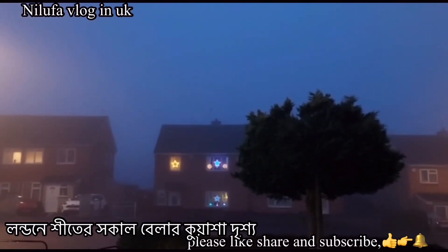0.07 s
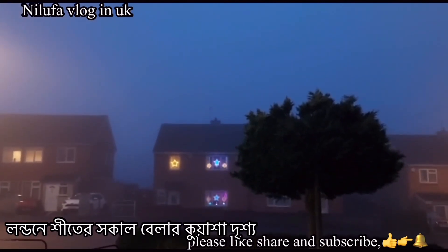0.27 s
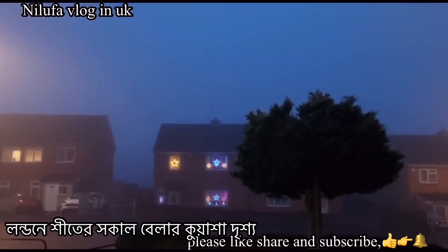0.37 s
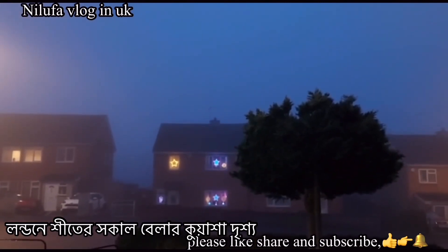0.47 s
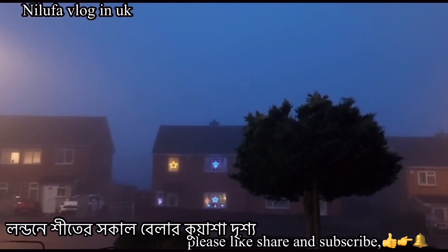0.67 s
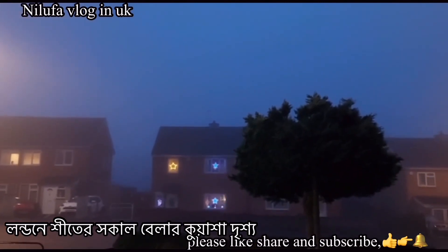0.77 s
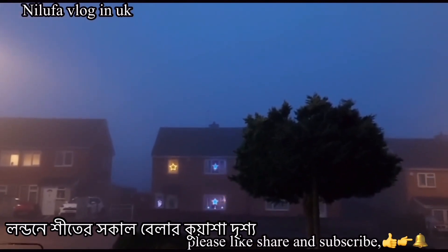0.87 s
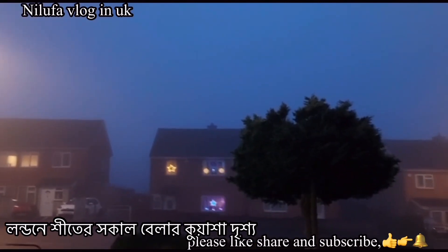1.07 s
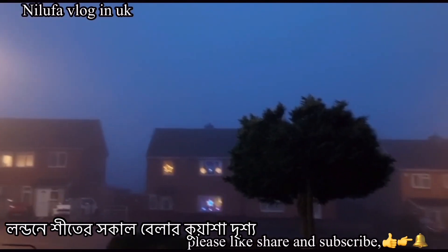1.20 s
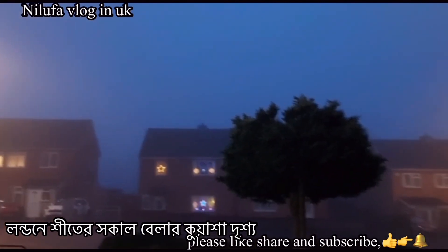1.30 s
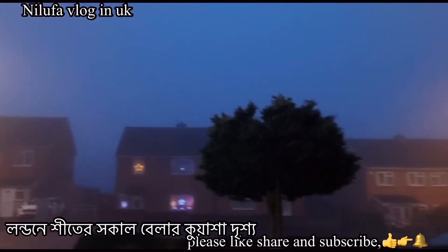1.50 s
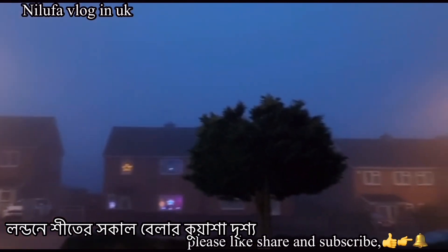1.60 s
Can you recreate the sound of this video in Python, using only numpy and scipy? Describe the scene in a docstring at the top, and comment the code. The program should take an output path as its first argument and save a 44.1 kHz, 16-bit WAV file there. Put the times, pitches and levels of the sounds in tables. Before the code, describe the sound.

A songbird whistles five short, evenly spaced rising notes on a quiet street. Each echoes off the house fronts in a fluttering tail. Faint distant birds, one small tick and soft air hiss lie behind.

```python
"""A quiet, foggy street. A songbird whistles five rising notes, each led in by a soft, higher grace note.
House fronts scatter the whistles into a long, fluttering tail. Behind them: far birds, one small tick,
soft rustles, faint air hiss, a thin high tone and a low hum."""
import sys
import numpy as np
from scipy import signal
from scipy.fft import rfft, irfft
from scipy.io import wavfile

SR = 44100
rng = np.random.default_rng(int(sys.argv[2]) if len(sys.argv) > 2 else 0)


def transcribe(u):
    """Save the signal u as a 16-bit wav file named by the first command-line argument.

    u: samples, shape (n,) or (channels, n), limited to [-1, 1]; the rate is SR.
    q: integer samples, one column per channel.
    """
    v = np.clip(np.atleast_2d(u).T, -1, 1)
    q = np.round(v * 32767).astype(np.int16)
    wavfile.write(sys.argv[1], SR, q)


N = 72765
TIME_S = np.arange(N) / SR
BIN_HZ = np.arange(N // 2 + 1) * SR / N
STREET_CORR, NEAR_CORR = 0.86, 0.57   # left-right correlation

# Main notes: (start [s], length [s], level [dB], swell [dB], sweep [Hz/s], held pitch [Hz], flick [Hz])
WHISTLE_NOTES = [(0.181, 0.051, -25, 18, 19820, 1985, 209.5), (0.387, 0.07, -18, 24, 18930, 1930, 265.5),
                 (0.633, 0.082, -18.5, 21.5, 19030, 1971, 52.5),
                 (0.878, 0.081, -18, 22.5, 16490, 1908, -1.5), (1.141, 0.094, -18, 28.5, 15400, 1909, -8)]


def whistles():
    """Each note starts raspy, swells as it sweeps up, levels off in pitch and may end in a flick."""
    sweep_from_hz, knee_hz, flick_s = 1306, 69, 0.02
    wobble_hz, rasp_hz, rasp_decay_s = 4.5, 65, 0.028
    attack_s, swell_s, release_s, fade_db_per_s = 0.006, 0.052, 0.014, 122
    second_db, second_fade_db_per_s, third_db = -19, 1299.5, -56
    wobble, rasp = wander(rate_hz=113), wander(rate_hz=280)
    out = np.zeros(N)
    for start_s, length_s, level_db, swell_db, sweep_hz_per_s, held_hz, flick_hz in WHISTLE_NOTES:
        t = np.clip(TIME_S - start_s, 0, length_s)
        shortfall_hz = held_hz - sweep_from_hz - sweep_hz_per_s * t
        hz = held_hz - knee_hz * np.logaddexp(0, shortfall_hz / knee_hz)   # soft ceiling
        hz += flick_hz * ramp((t - length_s + flick_s) / flick_s)
        hz += wobble_hz * wobble + rasp_hz * np.exp(-t / rasp_decay_s) * rasp
        rise_db = -swell_db * np.maximum(1 - t / swell_s, 0) ** 2
        fade_db = -fade_db_per_s * np.maximum(t - swell_s, 0)
        gate = ramp(t / attack_s) * ramp((length_s - t) / release_s)
        second = from_db(second_db - second_fade_db_per_s * t) * sine(2 * hz)
        third = from_db(third_db) * sine(3 * hz)
        out += from_db(level_db + rise_db + fade_db) * gate * (sine(hz) + second + third)
    return out


# Lead-in notes: (start [s], length before fade [s], level [dB], start pitch [Hz], rise [Hz/s])
GRACE_NOTES = [(0.148, 0.016, -43.5, 1930, 7500), (.357, 0.013, -38, 2215, 13550),
               (0.608, 0.014, -35.5, 2270, 15910), (0.854, 0.014, -36.5, 2250, 21800),
               (1.116, 0.017, -35, 2290, 14400)]


def grace_notes():
    """A soft, raspy slide before each whistle, still rising as it fades."""
    edge_s, tail_s, fade_db_per_s = 0.0032, 0.024, 797.5
    rasp_hz = 70 * wander(rate_hz=280)
    out = np.zeros(N)
    for start_s, length_s, level_db, from_hz, rise_hz_per_s in GRACE_NOTES:
        t = np.clip(TIME_S - start_s, 0, length_s + tail_s)
        gate = ramp(t / edge_s) * ramp((length_s + tail_s - t) / edge_s)
        fade_db = -fade_db_per_s * np.maximum(t - length_s, 0)
        out += from_db(level_db + fade_db) * gate * sine(from_hz + rise_hz_per_s * t + rasp_hz)
    return out


# House-front echoes: (delay [s], left [dB], right [dB])
HOUSE_ECHOES = [(.018, -10.5, -20.5), (.09, -24.5, -25), (.178, -20.5, -23.5), (0.234, -24, -27)]
# Long-tail colour: (frequency [Hz], gain [dB])
TAIL_EQ = [(1400, 1.5), (1700, -1.5), (1900, -1), (2100, -2), (2500, 1.5), (3000, 5)]


def street(song):
    """Direct sound, distinct echoes, scatter off nearby fences and trees, a long tail between houses."""
    tail_db, near_db, pan_db = -7, -11.5, 0.45
    crossover_hz, crossover_width_hz = 2400, 300
    low = rfft(scatter(t60_s=2.2, build_s=0.013, corr=STREET_CORR))
    high = rfft(scatter(t60_s=1.0, build_s=0.013, corr=STREET_CORR))
    high_share = ramp((BIN_HZ - crossover_hz) / crossover_width_hz + 0.5)
    spectrum = np.sqrt(1 - high_share) * low + np.sqrt(high_share) * high
    tail = irfft(spectrum * from_db(tail_db + per_bin(TAIL_EQ)), N)
    response = tail + from_db(near_db) * scatter(t60_s=0.18, build_s=0.011, corr=NEAR_CORR)
    response[:, 0] += from_db([-pan_db, pan_db])   # direct path
    for delay_s, left_db, right_db in HOUSE_ECHOES:
        response[:, int(delay_s * SR)] += from_db([left_db, right_db])
    return signal.fftconvolve(song[None], response, axes=1)[:, :N]


def scatter(t60_s, build_s, corr):
    """Dense reflections that build up and die away; unit mean energy per channel."""
    noise = stereo(*rng.standard_normal((2, N)), corr)
    tail = noise * from_db(-60 * TIME_S / t60_s) * ramp(TIME_S / build_s)
    return unit_rms(tail) / np.sqrt(N)


# Distant calls: (start [s], length [s], pitch [Hz], bandwidth [Hz], level [dB], decay [s])
FAR_BIRD_CALLS = [(-.03, .035, 7550, 1300, -55.5, .03), (0.271, 0.044, 2830, 60, -67.5, .015),
                  (0.494, 0.024, 2903, 60, -72.5, .015), (0.683, 0.15, 3450, 200, -67, .04),
                  (0.798, 0.081, 4360, 130, -63, .06)]


def far_birds(attack_s=0.02):
    """Thin calls, smeared by distance into narrow bands of reverberation."""
    out = np.zeros((2, N))
    for start_s, length_s, hz, width_hz, level_db, decay_s in FAR_BIRD_CALLS:
        t = TIME_S - start_s
        envelope = ramp(t / attack_s) * np.exp(-np.maximum(t - length_s, 0) / decay_s)
        out += from_db(level_db) * envelope * noise_band((2, N), hz, width_hz)
    return out


def tick(start_s=0.4441, impulse_db=-4.5, scatter_db=-4.5):
    """One small tick: a band-limited impulse with brief scatter behind it."""
    click = from_db(scatter_db) * scatter(t60_s=0.09, build_s=0.002, corr=NEAR_CORR)
    click[:, 0] += 1
    click = from_db(impulse_db) * np.pad(click, ((0, 0), (int(start_s * SR), 0)))[:, :N]
    click = butter(click, "high", hz=604)
    click = butter(click, "low", hz=916, order=1)
    return butter(click, "low", hz=5500, order=8)


# Rustle peaks: (time [s], level [dB])
RUSTLE_PEAKS = [(.44, -54.5), (.61, -56), (.725, -62), (0.889, -63.5), (1.162, -54)]
# Rustle spectrum: (frequency [Hz], relative density [dB])
RUSTLE_SPECTRUM = [(100, -28), (300, -15), (600, -1.5), (1100, -4.5), (3000, -7.5), (4500, -32),
                   (7000, -43)]


def rustles(attack_s=0.045, decay_s=0.088):
    """Faint, brief puffs of midrange noise."""
    envelope = np.zeros(N)
    for peak_s, level_db in RUSTLE_PEAKS:
        t = TIME_S - peak_s
        envelope += from_db(level_db) * ramp(t / attack_s + 1) * np.exp(-np.maximum(t, 0) / decay_s)
    return envelope * shaped_noise(RUSTLE_SPECTRUM, STREET_CORR)


# Air spectrum: (frequency [Hz], relative density [dB])
AIR_SPECTRUM = [(18, -49), (30, -9.5), (217, -7), (296, -10.5), (608, -9.5), (691, -9.5), (871, -11.5),
                (941, -9.5), (1280, -16.5), (1660, -17), (3400, -24), (12300, -31.5), (14000, -40.5)]
# Air stereo image: (frequency [Hz], left-right correlation [-])
AIR_CORR = [(30, 0.7), (90, 0.6), (160, -0), (280, -0.5), (600, -0.1), (1500, 0.6), (4000, 0.27),
            (12000, -0.1)]
# Treble hiss: (time [s], gain [dB])
HISS_GAIN = [(0, 3.5), (.5, 4), (.8, -0.5), (1.65, -0.5)]


def air(base_db=-58.5, shelf_hz=9000):
    """Faint, wide background noise; its treble eases off after about half a second."""
    noise = from_db(base_db) * shaped_noise(AIR_SPECTRUM, per_bin(AIR_CORR))
    hiss = irfft(rfft(noise) * ramp(BIN_HZ / shelf_hz - 0.5), N)
    hiss_gain = from_db(np.interp(TIME_S, *np.transpose(HISS_GAIN)))
    return noise + hiss * (hiss_gain - 1)


def thin_tone(level_db=-80):
    """A barely heard, steady high whistle of narrowband noise."""
    return from_db(level_db) * noise_band(N, hz=4370, width_hz=60)


# Hum partials: (frequency [Hz], rms level before wavering [dB])
HUM_PARTIALS = [(88.5, -71), (181, -79.5), (275, -79.5)]


def hum():
    """A low, wavering drone, as of a distant engine."""
    slow_noise = butter(rng.standard_normal((len(HUM_PARTIALS), 2 * N)), "low", hz=7.1)
    wavers = unit_rms(slow_noise[:, N:])   # skip filter settling
    return sum(np.sqrt(2) * from_db(level_db) * (1 + waver) * np.sin(2 * np.pi * hz * TIME_S)
               for (hz, level_db), waver in zip(HUM_PARTIALS, wavers))


def from_db(db):
    """Decibels to gain."""
    return 10 ** (np.asarray(db) / 20)


def unit_rms(x):
    """Scale to rms 1."""
    return x / np.sqrt(np.mean(x ** 2) + 1e-20)


def per_bin(table):
    """Table value at each FFT bin, interpolated in log frequency."""
    hz, values = np.transpose(table)
    return np.interp(np.log(BIN_HZ + 1), np.log(hz), values)


def butter(x, kind, hz, order=2):
    """Butterworth filter."""
    return signal.sosfilt(signal.butter(order, hz, kind, fs=SR, output="sos"), x)


def ramp(x):
    """Smooth step from 0 to 1."""
    return np.sin(np.pi / 2 * np.clip(x, 0, 1)) ** 2


def sine(hz):
    """Oscillator following a pitch curve."""
    return np.sin(2 * np.pi * np.cumsum(hz) / SR)


def wander(rate_hz):
    """Random wavering, rms 1."""
    return unit_rms(butter(rng.standard_normal(N), "low", rate_hz))


def stereo(mid, side, corr):
    """Two channels of given correlation from two independent noises."""
    return np.sqrt(1 + corr) * mid + np.sqrt(1 - corr) * side * np.array([[1], [-1]])


def noise_band(shape, hz, width_hz):
    """Band-passed noise, rms 1."""
    return unit_rms(butter(rng.standard_normal(shape), "band", [hz - width_hz / 2, hz + width_hz / 2]))


def shaped_noise(spectrum, corr):
    """Stereo noise of given spectrum, rms 1."""
    white = stereo(*rfft(rng.standard_normal((2, N))), corr)
    return unit_rms(irfft(white * from_db(per_bin(spectrum)), N))


def scene():
    """The bird in the street over the quiet background."""
    bird = street(whistles() + grace_notes())
    return bird + far_birds() + tick() + rustles() + air() + thin_tone() + hum()


def record(dry):
    """Steep elliptic low-pass."""
    cutoff_hz = 14200
    return signal.sosfilt(signal.ellip(10, 0.1, 80, cutoff_hz, fs=SR, output="sos"), dry)


dry = scene()
out = record(dry)
transcribe(out)
```